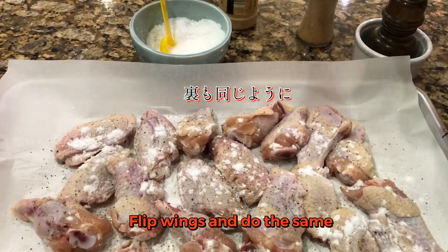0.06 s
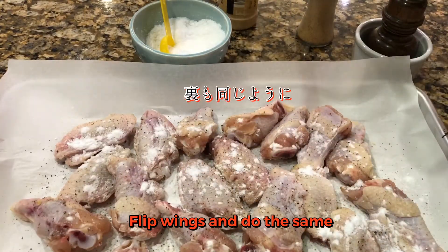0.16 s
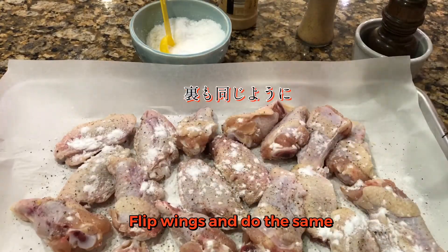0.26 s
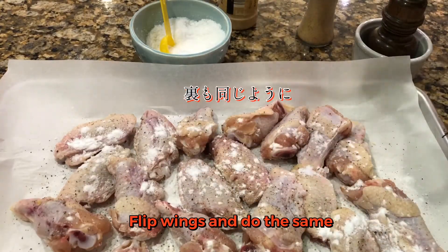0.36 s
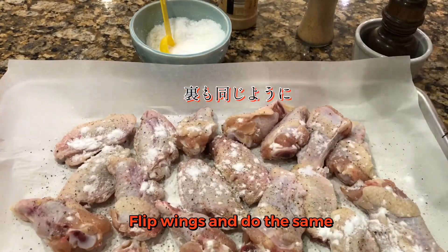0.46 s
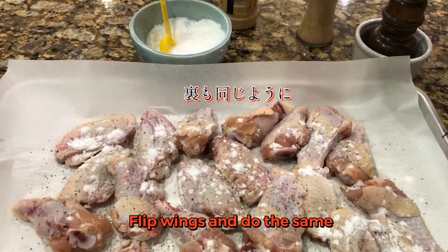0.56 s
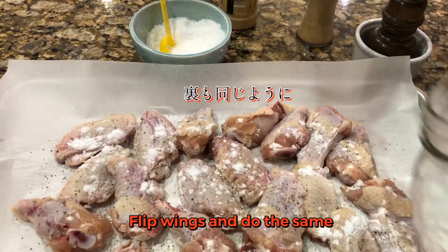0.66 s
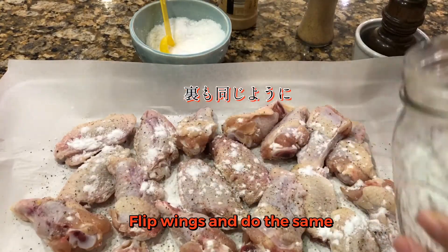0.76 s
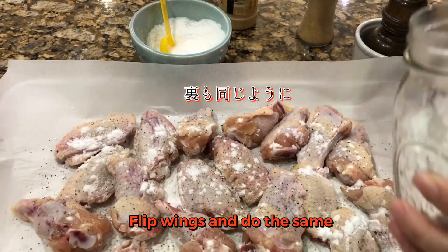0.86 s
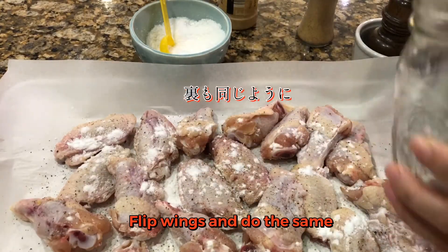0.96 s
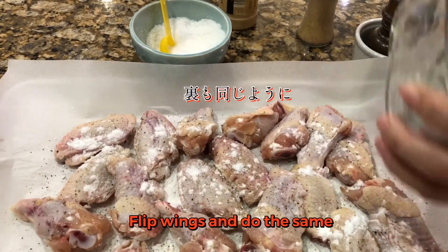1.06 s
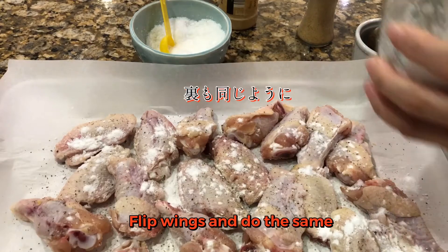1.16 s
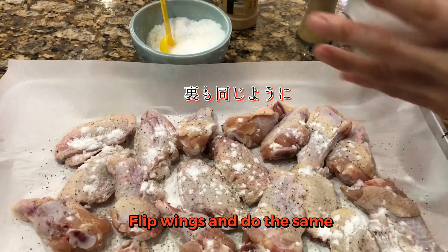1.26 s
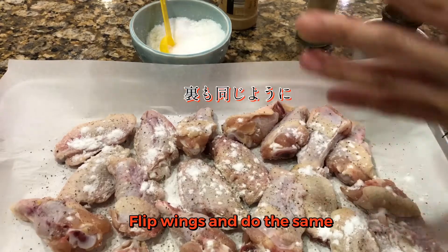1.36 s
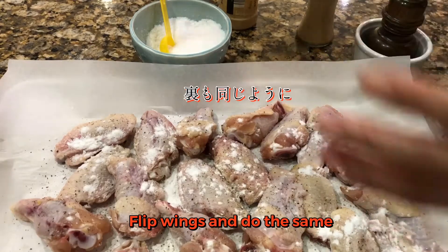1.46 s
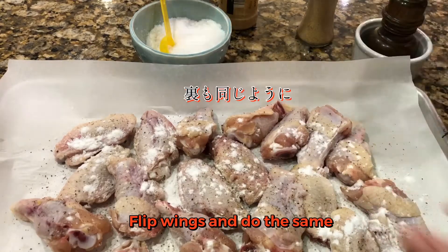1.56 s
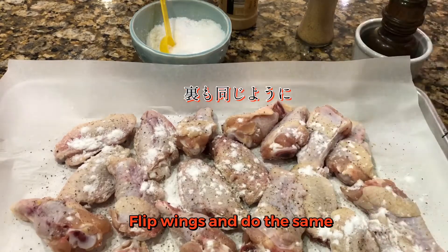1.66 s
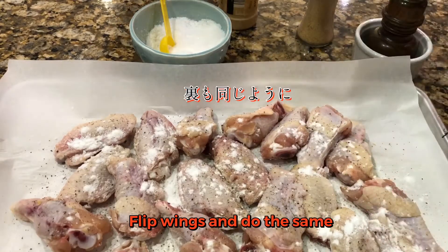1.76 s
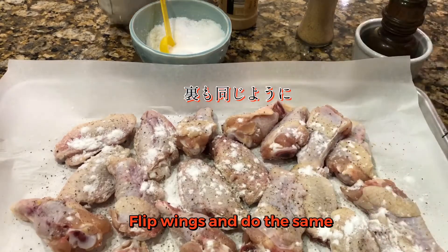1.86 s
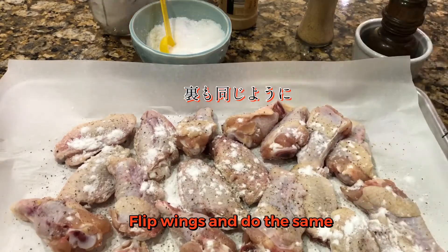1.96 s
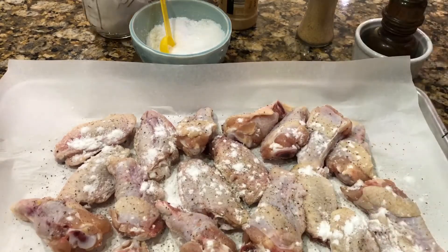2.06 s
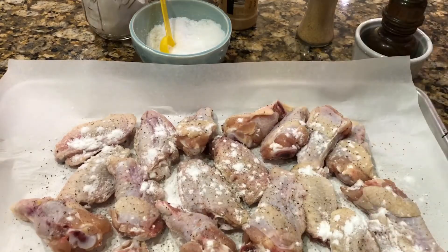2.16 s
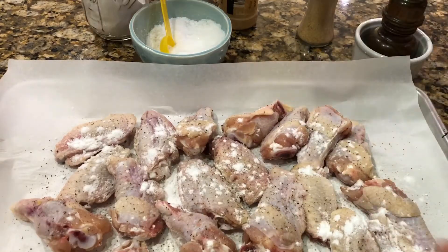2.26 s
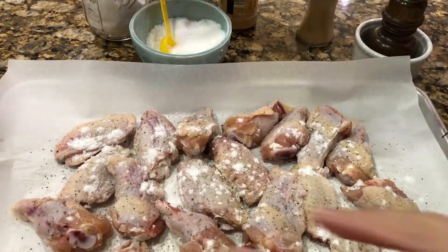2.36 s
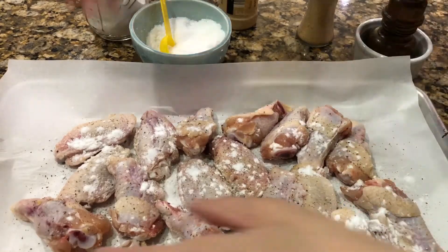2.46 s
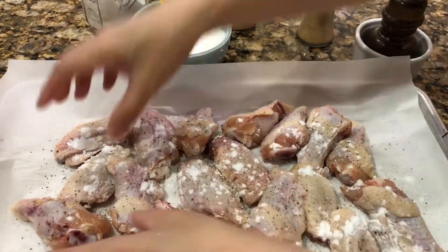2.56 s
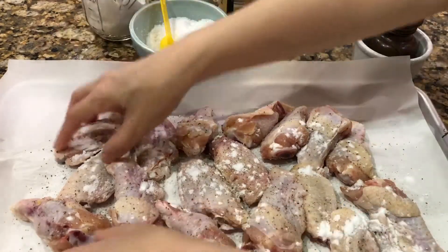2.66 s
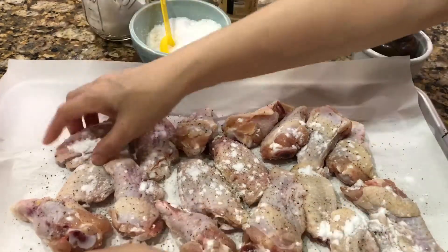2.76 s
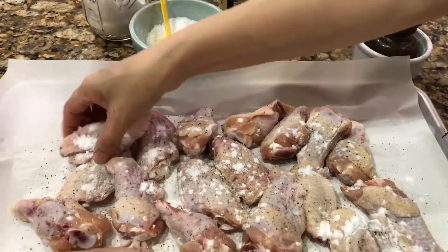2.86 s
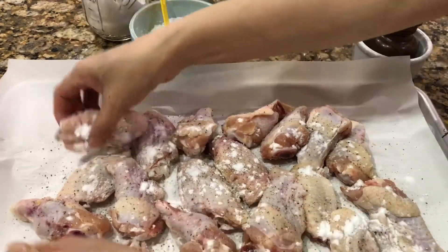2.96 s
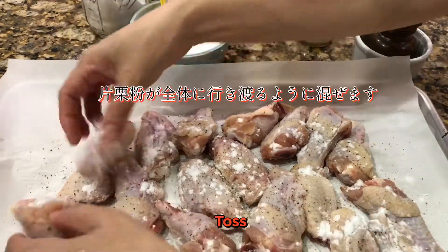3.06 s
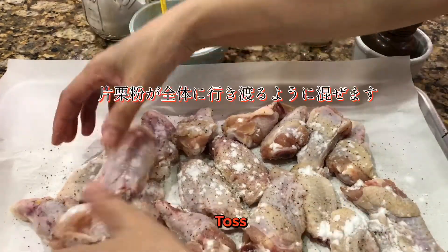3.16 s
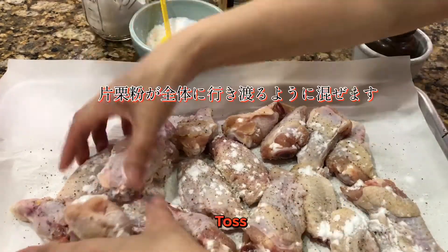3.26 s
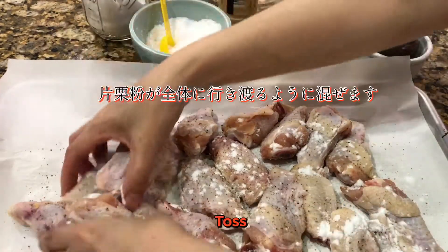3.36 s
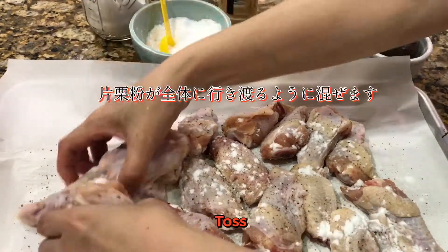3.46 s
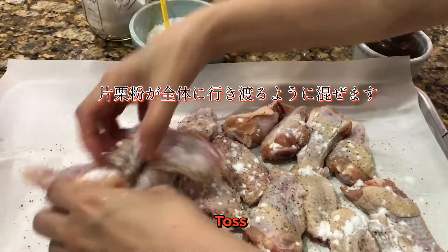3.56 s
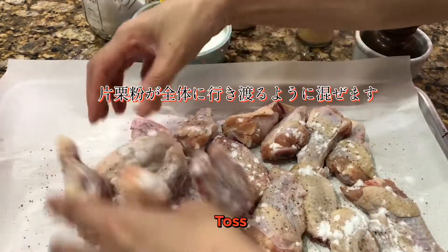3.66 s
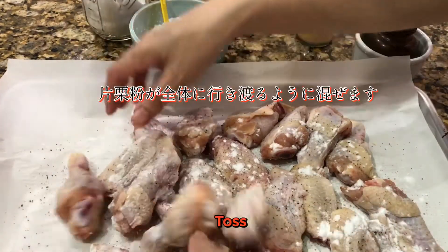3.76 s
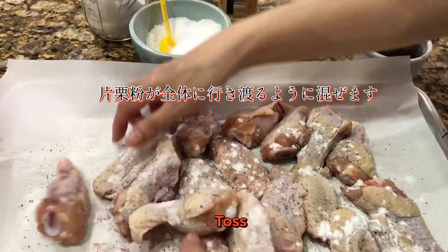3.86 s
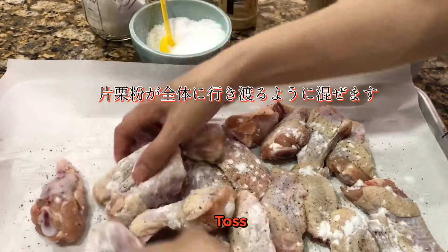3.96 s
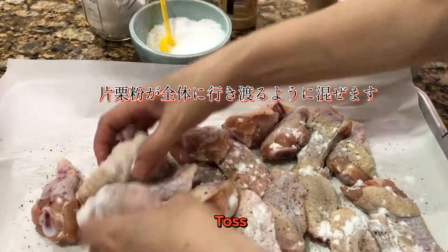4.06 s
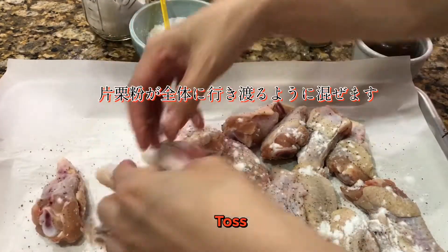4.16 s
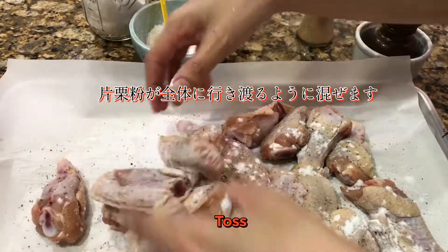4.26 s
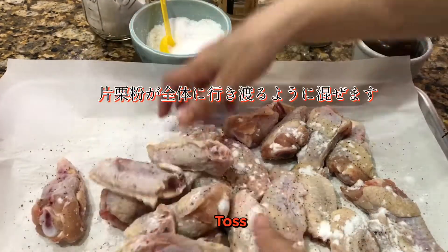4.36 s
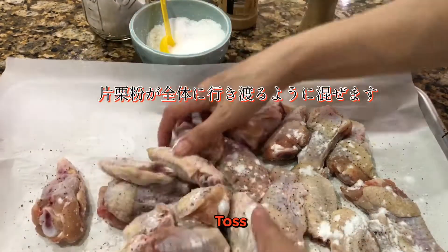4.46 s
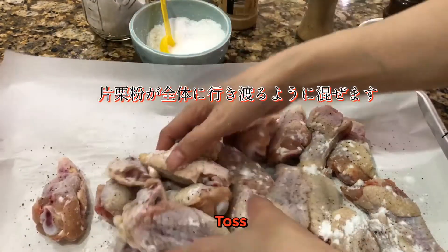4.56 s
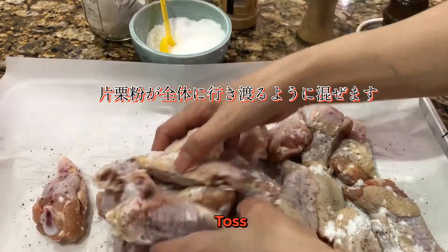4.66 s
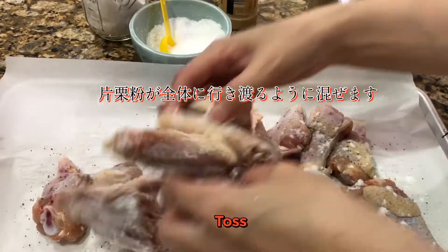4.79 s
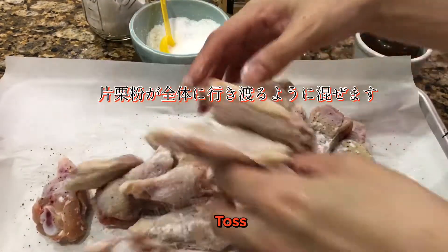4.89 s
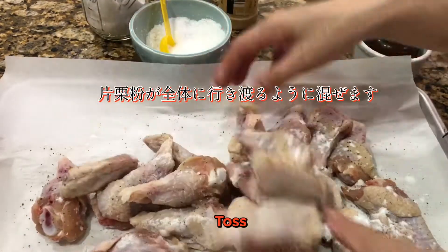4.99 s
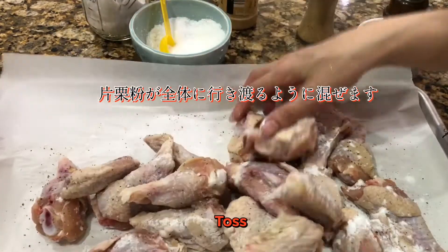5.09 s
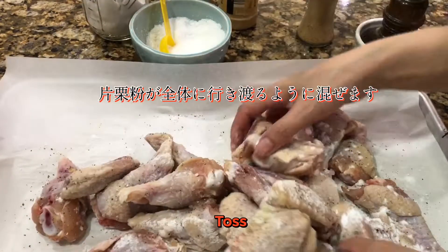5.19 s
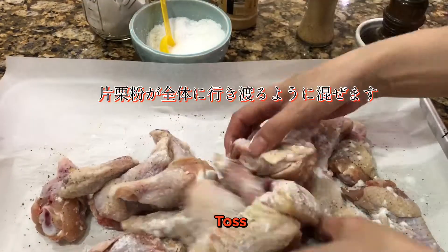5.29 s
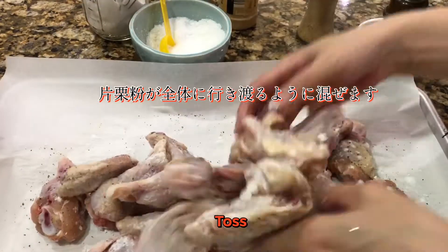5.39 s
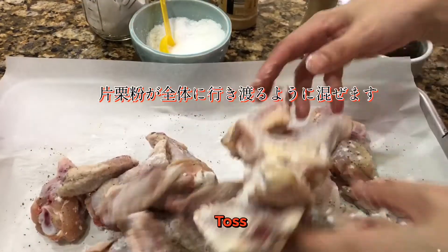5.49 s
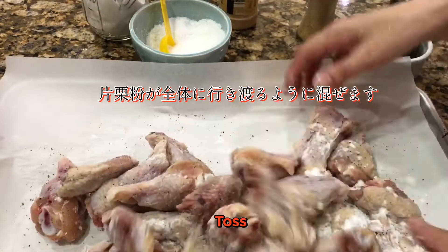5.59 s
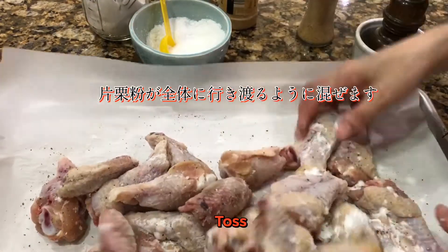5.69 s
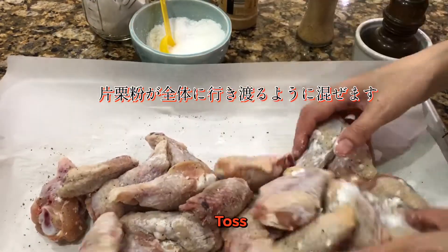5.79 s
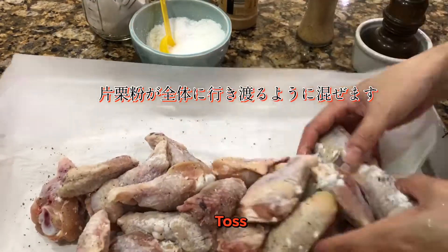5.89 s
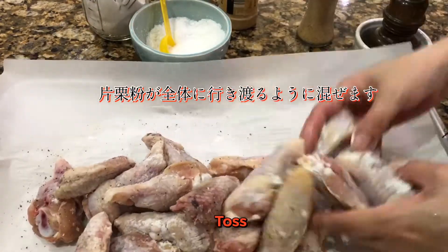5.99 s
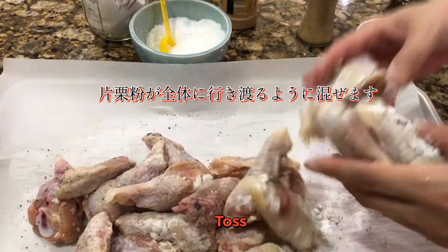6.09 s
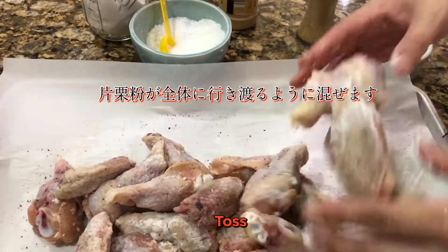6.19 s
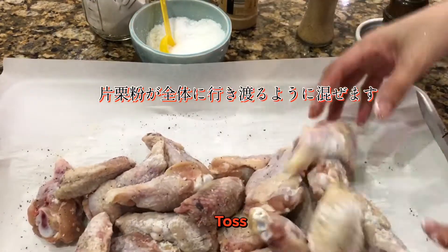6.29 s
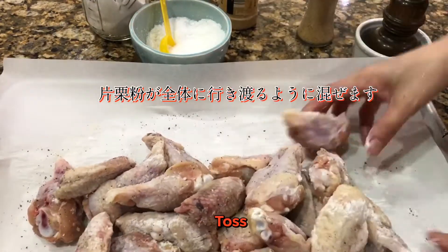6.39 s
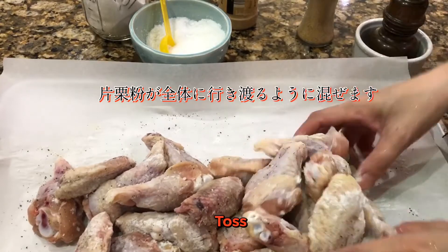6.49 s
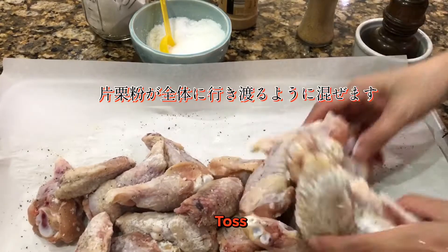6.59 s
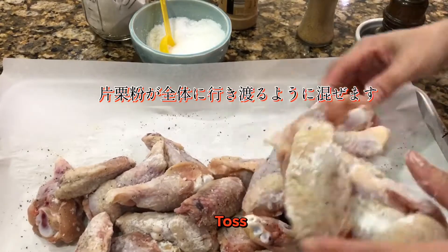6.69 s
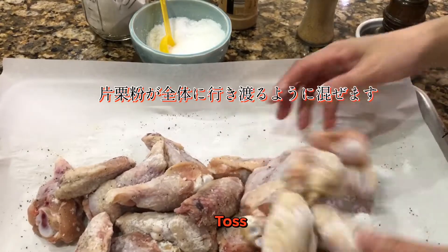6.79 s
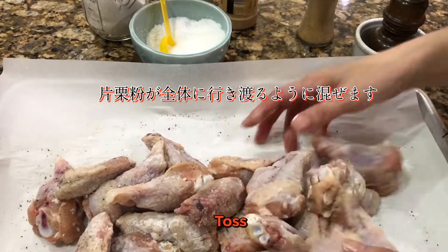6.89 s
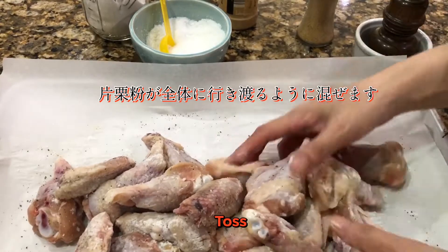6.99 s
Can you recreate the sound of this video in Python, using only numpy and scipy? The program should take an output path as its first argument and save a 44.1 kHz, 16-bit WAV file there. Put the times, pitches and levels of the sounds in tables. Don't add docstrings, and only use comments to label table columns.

```python
import sys
import numpy as np
from scipy import signal
from scipy.fft import rfft, irfft
from scipy.io import wavfile
from scipy.ndimage import uniform_filter1d

SR = 44100
rng = np.random.default_rng(int(sys.argv[2]) if len(sys.argv) > 2 else 0)


def convert_level_to_amplitude(level_db):
    exponent = np.asarray(level_db, float) / 20
    return 10 ** exponent


def output_pcm(signal):
    pcm = np.clip(np.atleast_2d(signal).T, -1, 1) * 32767
    wavfile.write(sys.argv[1], SR, np.round(pcm).astype(np.int16))


N = 310464


def evened(x):
    return x / np.sqrt(np.mean(x ** 2) + 1e-20)


def decay(t, t60):
    return convert_level_to_amplitude(-60 * t / t60)


def onset(t, rise_s):
    return np.minimum(t / rise_s, 1)


def read(points, hz):
    f, value = np.transpose(points)
    return np.interp(np.log(hz + 1), np.log(f + 1), value)


def colour(x, points):
    return irfft(rfft(x) * convert_level_to_amplitude(read(points, np.fft.rfftfreq(len(x), 1 / SR))), len(x))


def resonate(x, hz, width):
    return signal.lfilter(*signal.iirpeak(min(hz, SR / 2.2), max(hz / width, .2), SR), x)


def add(mix, s, sound):
    part = mix[round(s * SR):][:len(sound)]
    part += sound[:len(part)]


def ring(modes, t, spread_db):
    hz, db, t60 = np.transpose(modes)[:, :, None]
    luck, shift = rng.standard_normal((2, *hz.shape))
    detuned = hz * (1 + .002 * shift)
    return (convert_level_to_amplitude(db + spread_db * luck - 60 * t / t60) * np.sin(2 * np.pi * detuned * t)).sum(0)


# [f/Hz, level/dB per Hz]
AIR_SPECTRUM = [(15, -65.5), (49, -11), (90, -17), (159, -7), (300, -13.5), (700, -19.5), (1900, -28),
                (16500, -54.5)]
# [f/Hz, bandwidth/Hz, level/dB]
HUM_LINES = [(120, 9.5, -62), (239.2, 13, -62), (286.6, 4, -59.5)]


def air():
    frames, hz = N // 256 + 5, np.fft.rfftfreq(1024, 1 / SR)
    a, b, patches = rng.standard_normal((frames, 513, 3)).T
    patches = evened(uniform_filter1d(uniform_filter1d(patches, size=8, axis=0), size=16, axis=1))
    spectrum = (a + 1j * b) * convert_level_to_amplitude(0.31 * patches)
    hiss = evened(signal.istft(spectrum, nperseg=1024, noverlap=768)[1][:N])
    hum = sum(convert_level_to_amplitude(db) * evened(resonate(rng.standard_normal(N), hz, width)) for hz, width, db in HUM_LINES)
    return convert_level_to_amplitude(-54) * evened(colour(hiss, AIR_SPECTRUM)) + hum


# [f/Hz, t60/s]
ROOM_DECAY = [(200, 0.64), (600, 0.58), (1500, 0.58), (4000, 0.16), (10000, 0.53)]


def kitchen(x):
    taps = np.zeros(SR)
    at = np.arange(120, SR - 20, 20)
    taps[at + rng.integers(0, 20, len(at))] = rng.choice([-1., 1.], len(at))
    hz, t, z = signal.stft(taps, SR, nperseg=256)
    tail = signal.istft(z * decay(t, read(ROOM_DECAY, hz)[:, None]), SR, nperseg=256)[1]
    return signal.fftconvolve(x, tail / np.linalg.norm(tail))[:N]


# [t/s, peak level/dB]
BASE_KNOCKS = [
    (1.94, -7.5),
    (2.076, -16),
]
# [f/Hz, level/dB per Hz]
THUD_SPECTRA = [
    [(200, -13), (600, -1), (1400, -8), (2200, -9.5), (4300, -18), (5600, -44), (7500, -32.5), (14000, -72)],
    [(180, -50.5), (300, -29), (613, 1), (1060, -10), (1570, -13), (2230, -14.5), (4910, -38),
     (13200, -110)],
]
# [f/Hz, level/dB, t60/s]
COUNTER_MODES = [(206, -15, 0.0374), (336, -16.5, 0.038), (555, -14.5, 0.093)]


def counter():
    out, t = np.zeros(N), np.arange(8000) / SR
    stone = signal.butter(2, 400., "highpass", fs=SR, output="sos")
    for (s, peak_db), thud in zip(BASE_KNOCKS, THUD_SPECTRA):
        grit = colour(rng.standard_normal(len(t)), thud)
        dull = signal.lfilter(*signal.butter(1, 2610, fs=SR), grit)
        bright_part = grit * (decay(t, 0.033) + convert_level_to_amplitude(-29.0) * decay(t, 0.22))
        dying = bright_part + dull * convert_level_to_amplitude(-27.0) * decay(t, 1.43)
        clatter = signal.sosfilt(stone, dying * onset(t, 0.0004))
        crack = convert_level_to_amplitude(-30.0) * decay(t, 0.023) * np.diff(rng.standard_normal(len(t) + 1))
        modes = ring(COUNTER_MODES, t, spread_db=-1.5) * onset(t, 0.0057)
        add(out, s + 0.0023, convert_level_to_amplitude(peak_db) * (clatter / abs(clatter).max() + crack + modes))
    return out


# [f/Hz, level/dB, t60/s]
GLASS_MODES = [(2866, -4, 0.15), (2964, -5, 0.18)]
SHOULDER_MODES = [(5670, -15, .04), (6335, -2, .04), (7085, -7, .05), (7400, -3, .04), (7530, 6, .022),
                  (7660, -1, .03), (8690, 1, .045), (8870, -4, .035)]
LID_MODES = [(10055, -10, .08), (10970, -14, .05), (11790, -10, .045), (12135, -3, .03), (12840, -6, .03),
             (13300, 4, .012), (13840, -1, .025), (14750, -2, .03), (15270, -2, .045)]
# [t/s, glass level/dB, shoulder level/dB, lid level/dB]
JAR_TAPS = [(0.799, -50.5, -53, -55), (0.8495, -77, -69, -50), (0.877, -82, -68, -47),
            (0.8916, -66, -69, -48), (0.9073, -30.5, -22.5, -30), (0.9311, -12.5, -20, -19),
            (0.936, -48, -13.5, -17), (0.989, -56, -36, -50), (1.0562, -39, -41, -31),
            (1.0764, -57, -57, -46), (1.088, -38, -27, -34), (1.1488, -40.5, -30, -42),
            (1.1644, -59, -49, -49.5), (1.449, -47.5, -67.5, -48), (1.499, -53, -45, -61),
            (1.528, -55, -51.5, -43), (1.5614, -62, -63.5, -48.5), (1.7105, -57.5, -54.5, -58),
            (1.8208, -54, -72, -69.5), (1.9994, -45, -67, -60), (2.0736, -43, -65, -54),
            (2.089, -47, -69, -47), (2.113, -52, -56, -38), (2.15, -52, -59, -46), (2.197, -62.5, -73, -44),
            (2.2794, -65, -73, -58)]
# [t/s, level/dB]
BELLY_BUMPS = [
    (0.9089, -31.5),
    (0.919, -31.5),
    (0.9358, -15),
    (0.965, -29.5),
    (1.151, -58),
]
# [f/Hz, level/dB, t60/s]
BELLY_MODES = [(247, -10.5, 0.08), (583, -2, 0.042), (800, -7, 0.05), (1000, -1.5, 0.038),
               (1697, -1.5, 0.08), (2030, -8, .04), (4228, -30, .1), (7530, -5.5, 0.027)]


def jar():
    out, t = np.zeros(N), np.arange(8000) / SR
    peak_over_part_db = 10.5
    beat_lead_turns = .12
    grip = 1 - 0.4 / (1 + np.exp((.02 - t) / 0.002))
    for s, glass_db, shoulder_db, lid_db in JAR_TAPS:
        peak_db = max(glass_db, shoulder_db, lid_db) + peak_over_part_db
        contact = rng.standard_normal(400) * decay(t[:400], 0.022)
        tick = convert_level_to_amplitude(lid_db - 7.5) * np.diff(contact)
        lower = ring(GLASS_MODES[:1], t, spread_db=0)
        leading = ring(GLASS_MODES[1:], t + beat_lead_turns / GLASS_MODES[1][0], spread_db=0)
        body = convert_level_to_amplitude(glass_db + 2.5) * (lower - leading) * grip
        upper = convert_level_to_amplitude(shoulder_db - 14) * ring(SHOULDER_MODES, t, spread_db=3)
        upper = upper + convert_level_to_amplitude(lid_db - 13) * ring(LID_MODES, t, spread_db=3)
        wash_decay = decay(t, 0.046) + convert_level_to_amplitude(-13.0) * decay(t, 0.36)
        crowded_modes = resonate(rng.standard_normal(len(t)), 3600, 3600)
        scraped = signal.oaconvolve(upper, contact / np.linalg.norm(contact))[:len(t)]
        add(out, s + 0.0015, tick)
        add(out, s + 0.00062, convert_level_to_amplitude(peak_db - 21.0) * wash_decay * crowded_modes)
        add(out, s + 0.001, body * onset(t, 0.00064) + scraped)
    for s, db in BELLY_BUMPS:
        add(out, s, convert_level_to_amplitude(db) * ring(BELLY_MODES, t, spread_db=-3.0) * onset(t, 0.0016))
    return out


def along(rows):
    s, *columns = np.transpose(rows)
    i = np.arange(round(s[0] * SR), min(round(s[-1] * SR), N))
    return i, [np.interp(i / SR, s, c) for c in columns]


# [t/s, glass level/dB, shoulder and lid level/dB]
CHATTER_MOVES = [
    [(0.96, -39, -67), (1.15, -48.5, -57), (1.234, -49, -49.5), (1.36, -74.5, -94)],
    [(1.41, -56.5, -98), (1.46, -52, -55.5), (1.6, -63, -58)],
    [(1.7, -65, -68), (1.894, -54, -67.5), (1.93, -66, -84)],
]


def chatter():
    t, glass, upper = np.arange(8000) / SR, np.zeros(N), np.zeros(N)
    sizes = convert_level_to_amplitude(4 * np.minimum(rng.exponential(1, N), 3))
    happens = rng.random(N) < 500. / SR
    contacts = evened(sizes * happens * rng.choice([-1, 1], N))
    grip_s = 0.075
    spot = rng.integers(0, 6, 400)[np.minimum(np.arange(N) / (grip_s * SR), 399).astype(int)]
    for rows in CHATTER_MOVES:
        i, (glass_db, upper_db) = along(rows)
        glass[i] = convert_level_to_amplitude(glass_db - 4.0) * contacts[i]
        upper[i] = convert_level_to_amplitude(upper_db - 6.0) * contacts[i]
    loose = [(hz, min(db, -4), max(t60, .07)) for hz, db, t60 in [*SHOULDER_MODES, *LID_MODES]]
    held_pitch = .989
    out = np.zeros(N)
    for k in range(6):
        glass_ring = ring(GLASS_MODES, held_pitch * t, spread_db=2.5) * decay(t, 0.1)
        upper_ring = ring(loose, t, spread_db=4)
        for x, r in (glass, glass_ring), (upper, upper_ring):
            out += signal.oaconvolve(x * (spot == k), r / np.linalg.norm(r))[:N]
    grazing = resonate(resonate(upper, 5500, 4000), 5500, 4000)
    return out + convert_level_to_amplitude(-5) * grazing


# [t/s, f/Hz, level/dB, t60/s]
STRUCK_PINGS = [(.8505, 11700, -51, 0.054), (.8505, 13890, -58, .06), (.8926, 13690, -51, .08),
                (.8926, 11875, -48, .08), (.909, 7075, -44, .06), (.923, 12190, -31, .06),
                (0.9307, 8680, -18, .03), (.9312, 15270, -17, .035), (.9335, 13800, -17, .03),
                (.9365, 7540, -10.5, 0.02), (.937, 12100, -16.5, 0.028), (.939, 10100, -25, 0.082),
                (0.937, 4250, -26.5, 0.1), (0.92, 975, -31, 0.052), (1.089, 7800, -28, .03),
                (1.089, 3900, -36.5, 0.039), (.938, 7100, -32, 0.14), (.990, 7430, -42, .1),
                (1.0565, 14750, -36, .035), (1.0565, 13470, -40, .03), (1.0565, 7260, -42, .05),
                (1.0565, 6340, -45, 0.041), (1.077, 11865, -48, .04), (1.077, 14750, -50, .05),
                (1.0896, 2875, -18.5, 0.06), (1.089, 6310, -27.5, .046), (1.089, 7450, -32.5, 0.076),
                (1.089, 13480, -34, .04), (1.152, 8500, -35, 0.044), (1.150, 6040, -37, .035),
                (1.150, 7700, -44, .06), (1.150, 3180, -32, .018), (1.1654, 6135, -51, 0.05),
                (1.1654, 10980, -58, 0.14), (1.450, 14750, -49, 0.06), (1.450, 13900, -45, .04),
                (1.500, 8600, -54, .05), (1.5293, 8700, -53, 0.13), (1.5303, 6105, -58, .08),
                (1.5624, 14750, -57, .14), (1.5624, 10130, -59, .06), (1.5624, 11885, -58, .1),
                (1.725, 12300, -58, .035), (1.83, 8700, -63, .1), (1.9415, 13300, -34, .03),
                (1.9414, 7680, -40, 0.032), (2.114, 8800, -48, 0.051), (2.114, 4230, -60, 0.097),
                (2.2804, 11950, -63, 0.05)]
# [t/s, f/Hz, level/dB, t60/s]
LINGERING_RINGS = [(.937, 4245, -47, .7), (.937, 1697, -43, .6), (.966, 575, -34, .05),
                   (1.152, 590, -38, .06), (1.943, 2900, -47, .25), (2.078, 565, -37, .2),
                   (.937, 8680, -47, .25), (.937, 8872, -50, .3), (.937, 13730, -50, .24),
                   (.937, 11790, -48, .2), (.937, 6315, -50, .3), (1.089, 10970, -50, .12),
                   (1.089, 12840, -44, .05), (1.152, 8740, -46, .2), (2.15, 4290, -60, .2)]
# [t/s, level/dB]
LID_SETTLES = [
    (2.0004, -59),
    (2.091, -46),
    (2.151, -49),
    (2.198, -49),
]
# [f/Hz, level/dB, t60/s]
RIM_MODES = [(11950, -1, 0.053), (13910, -3, .045)]


def pings():
    out, t = np.zeros(N), np.arange(16000) / SR
    settling = [(s, hz, db + rim_db, t60) for s, db in LID_SETTLES for hz, rim_db, t60 in RIM_MODES]
    for s, hz, db, t60 in [*STRUCK_PINGS, *LINGERING_RINGS, *settling]:
        add(out, s, convert_level_to_amplitude(db) * decay(t, t60) * np.sin(2 * np.pi * hz * t) * onset(t, 0.00051))
    return out


# [t/s, peak level/dB, f/Hz, t60/s]
TRAY_BUMPS = [(3.291, -43, 120, 0.37), (3.819, -37, 122, 0.26), (4.34, -34, 229, 0.092),
              (5.388, -25.5, 171, .07), (5.39, -25, 64, 0.18), (5.431, -26, 145, 0.2),
              (5.44, -29.5, 51.3, 0.44), (5.555, -25, 368, 0.064), (5.619, -33, 257, 0.13),
              (5.677, -33, 126, 0.1), (6.248, -24, 115, 0.061), (6.779, -26, 234, 0.14),
              (6.783, -35, 120, 0.32)]


def tray():
    out, t = np.zeros(N), np.arange(15000) / SR
    for s, peak_db, hz, t60 in TRAY_BUMPS:
        loose = resonate(resonate(rng.standard_normal(len(t)), 1.26 * hz, 2.0 * hz), 1.26 * hz, 2.0 * hz)
        flex = np.sin(2 * np.pi * hz * t) + .5 * evened(loose)
        add(out, s, convert_level_to_amplitude(peak_db - 7.0) * decay(t, t60) * flex * onset(t, 0.0019))
    return out


# [t/s, peak level/dB]
FLOUR_TICKS = [(.584, -60), (3.067, -47), (3.509, -41), (4.0971, -52), (4.113, -52), (4.1275, -53),
               (4.1609, -44), (4.2003, -35), (4.2762, -43.5), (4.2911, -41), (4.314, -42), (4.976, -33),
               (5.2614, -39), (5.3294, -41.5), (6.6544, -55)]


def ticks():
    out, t = np.zeros(N), np.arange(200) / SR
    for s, peak_db in FLOUR_TICKS:
        click = resonate(rng.standard_normal(len(t)) * decay(t, 0.0088), 10700.0, 7000.)
        add(out, s + 0.0014, convert_level_to_amplitude(peak_db) * click / abs(click).max())
    return out


# [centre t/s, level/dB, f/Hz, half length/s]
PAPER_HOLLOWS = [(2.693, -57, 3450, 0.056), (2.824, -42.5, 2970, 0.013), (3.227, -42, 3820, 0.0089),
                 (3.292, -43, 1880, 0.024), (3.316, -43, 4340, 0.025), (3.846, -42, 2950, 0.04),
                 (3.907, -40, 2720, 0.037), (4.229, -46.5, 1600, 0.021), (4.387, -36.5, 4600, 0.031),
                 (4.449, -39, 1850, 0.046), (4.6, -38, 2590, 0.014), (5.081, -38, 4970, 0.018),
                 (5.145, -45, 1500, 0.036), (5.786, -42, 1390, 0.052), (6.256, -48, 1250, 0.033),
                 (6.388, -41, 1700, 0.044), (6.878, -38, 1610, .02), (6.918, -36.5, 1650, 0.026),
                 (6.967, -44.5, 1540, 0.047), (6.352, -42.5, 4200, 0.045), (2.818, -43.5, 8600, 0.013),
                 (4.029, -45.5, 8300, .006), (3.325, -45, 8040, 0.011), (3.397, -56, 3900, .02),
                 (5.683, -31, 5060, 0.0092)]


def hollows():
    out = np.zeros(N)
    for s, db, hz, half in PAPER_HOLLOWS:
        u = np.arange(-2.5, 2.5, 1 / (half * SR))
        pocket = resonate(resonate(rng.standard_normal(len(u)), hz, 0.5 * hz), hz, 0.5 * hz)
        add(out, s + u[0] * half, convert_level_to_amplitude(db) * evened(pocket) * np.exp(-u ** 2))
    return out


# [centre t/s, peak level/dB, f/Hz]
SKIN_POPS = [(3.266, -38, 1830), (4.056, -21, 1235), (4.216, -40, 1600), (4.334, -29, 1223),
             (4.362, -32.5, 830), (4.872, -34.5, 1770), (5.0398, -25.5, 960), (5.43, -27, 1060),
             (5.516, -29.5, 1260), (5.56, -28, 700), (6.044, -20, 1140), (6.2392, -1.8, 1420),
             (6.308, -22.5, 1800), (6.777, -13, 1090), (6.79, -15, 1240), (6.8053, -28, 780),
             (6.824, -28, 1290)]


def pops():
    out, t = np.zeros(N), np.arange(-300, 300) / SR
    for s, peak_db, hz in SKIN_POPS:
        u = hz * t
        add(out, s + t[0], convert_level_to_amplitude(peak_db) * np.exp(-u ** 2) * np.cos(2 * np.pi * (u - 0.16 * u ** 2)))
        smack = resonate(rng.standard_normal(300), 2.6 * hz, 2.6 * hz) * decay(t[300:], .007)
        add(out, s - .6 / hz, convert_level_to_amplitude(peak_db - 10.) * smack)
    return out


# [peak t/s, rub level/dB, fall time/s, weight/dB]
WING_GRABS = [(2.645, -53.5, 0.18, 1), (2.816, -47.5, 0.04, -3.5), (2.879, -60, 0.23, -6),
              (3.218, -42.5, 0.035, 0), (3.599, -59, 0.058, -16), (3.657, -48, 0.036, -1),
              (3.785, -40, 0.23, 0), (4.22, -48, 0.055, 6.5), (4.362, -39, 0.073, -0.5),
              (4.403, -44, 0.13, 2), (4.6, -46, 0.035, 6), (4.966, -54.5, 0.021, 12),
              (5.023, -42.5, 0.038, 1.5), (5.045, -43, 0.16, 4.5), (5.52, -48.5, 1, 0.5),
              (5.593, -33.5, 0.2, -1), (5.684, -42, 0.034, -5), (5.828, -39.5, 0.049, 7.5),
              (6.204, -42, 0.03, 2.5), (6.244, -36.5, 0.029, 13), (6.31, -41, 0.12, 4),
              (6.751, -54.5, 0.016, 6), (6.781, -45, 0.037, 7.5)]
# [peak t/s, rub level/dB, fall time/s, weight/dB]
WING_SLAPS = [
    (4.3318, -31.5, 0.023, -4.5),
    (6.7782, -31, 0.018, 10.5),
    (6.7915, -33.5, 0.011, 9.5),
]
# [peak t/s, rub level/dB, rise time/s, fall
# time/s, weight/dB]
SLOW_RUBS = [(.08, -71.5, 0.049, 0.11, -13), (3.295, -43.5, 0.053, 0.12, -3.5),
             (3.4, -67, 0.058, 0.53, -5), (3.765, -50, 0.048, 0.13, -2), (3.911, -49, 0.042, 0.082, 7),
             (4.062, -61.5, 0.006, 0.033, 23.5), (4.52, -44.5, 0.15, 0.2, 0.5),
             (4.78, -60.5, 0.025, 0.1, -23), (4.86, -56.5, 0.036, 0.23, -10),
             (5.132, -38.5, 0.046, 0.02, -1), (5.223, -47.5, 0.096, 0.097, -1),
             (5.43, -61.5, 0.14, 0.87, -6), (5.79, -50, 0.03, 0.15, -5),
             (5.955, -47.5, 0.095, 0.042, 2.5), (6.051, -54.5, 0.037, 0.035, 7),
             (6.131, -86, 0.057, 0.079, 11), (6.454, -47.5, 0.14, 0.05, -1), (6.915, -44, 0.11, 0.19, -5),
             (7.02, -51.5, 0.12, 0.3, 0.5)]


def strokes():
    grabs = [(s, db, 0.016 * convert_level_to_amplitude(-0.22 * (db + 58.0)), fall, weight) for s, db, fall, weight in WING_GRABS]
    slaps = [(s, db, 0.0018, fall, weight) for s, db, fall, weight in WING_SLAPS]
    return [(s, db, -4 + weight, -1.5 - 0.63 * weight, rise, fall)
            for s, db, rise, fall, weight in [*grabs, *slaps, *SLOW_RUBS]]


# [f/Hz, level/dB]
PAPER_SPECTRUM = [(180, -38), (350, -3.5), (600, -11), (1830, -0.5), (3900, 1), (6780, -1.5), (15200, -6.5),
                  (16500, -20)]


def sliding():
    chance = rng.standard_normal(N)
    clumps_db = 1.3 * evened(uniform_filter1d(uniform_filter1d(chance, size=300), size=300))
    crackle = np.zeros(N)
    for hz in np.geomspace(900, 12000, num=9):
        sizes = convert_level_to_amplitude(1.3 * np.minimum(rng.exponential(1, N), 4)) * (rng.random(N) < 150. / SR)
        u = np.arange(0, 6, hz / SR)
        crease = np.sqrt(hz) * np.sin(2 * np.pi * u) * u * np.exp(-u / 0.48)
        crackle += signal.oaconvolve(sizes, crease)[:N] * np.sqrt(hz)
    rub = colour((0.63 * evened(crackle) + rng.standard_normal(N)) * convert_level_to_amplitude(clumps_db), PAPER_SPECTRUM)
    z = signal.stft(rub, nperseg=256)[2]
    patches = np.resize(chance, z.shape)
    patches = evened(uniform_filter1d(uniform_filter1d(patches, size=5, axis=0), size=7, axis=1))
    rub = signal.istft(z * convert_level_to_amplitude(2.2 * patches), nperseg=256)[1][:N]
    low = signal.sosfiltfilt(signal.butter(2, 2000, fs=SR, output="sos"), rub)
    high = signal.sosfiltfilt(signal.butter(2, 6500, "highpass", fs=SR, output="sos"), rub)
    low, mid, high = evened(low), evened(rub - low - high), evened(high)
    out = np.zeros(N)
    for s, rub_db, low_db, high_db, rise, fall in strokes():
        i = np.arange(max(round((s - 2 * rise) * SR), 0), min(round((s + 2 * fall) * SR), N))
        late = i / SR - s
        swell_db = 20 * np.where(late < 0, -(late / rise) ** 2, -late / fall)
        parts = mid[i] + convert_level_to_amplitude(low_db) * low[i] + convert_level_to_amplitude(high_db) * high[i]
        out[i] += convert_level_to_amplitude(rub_db + swell_db) * parts
    return out


# [t/s, peak level/dB, centre f/Hz]
BIG_FOLDS = [(2.812, -33, 3250), (3.21, -33, 4170), (3.768, -22, 4700), (3.781, -7.5, 2950),
             (4.3291, -19, 3300), (4.36, -27, 5160), (4.3903, -19, 4210), (4.4671, -16, 2370),
             (4.5305, -18.5, 3550), (4.594, -22, 2380), (4.8332, -22, 4900), (4.872, -28.5, 2000),
             (4.9556, -23, 4040), (5.0435, -10, 4400), (5.1293, -20.5, 4360), (5.423, -24.5, 8500),
             (5.5162, -20.5, 2020), (5.58, -8, 3630), (5.64, -15, 4300), (5.673, -8.5, 4320),
             (5.8257, -7, 3970), (5.835, -12, 6300), (5.867, -15.5, 5950), (5.919, -16, 3920),
             (6.2102, -25, 2620), (6.2415, -12, 4230), (6.305, -19, 4750), (6.3154, -29, 2280),
             (6.776, -13.5, 3980), (6.7926, -18, 4400)]
# [t/s, peak level/dB, centre f/Hz]
SMALL_CRINKLES = [(2.6314, -36, 1790), (2.869, -25.5, 5120), (2.9168, -33.5, 8360), (2.9696, -43.5, 3150),
                  (3.219, -31, 3910), (3.4064, -39, 3840), (3.478, -39, 3400), (3.567, -28, 4600),
                  (3.5902, -31.5, 2940), (3.6444, -37, 4470), (3.6614, -33, 3420), (3.7112, -27, 4940),
                  (4.4109, -20, 1780), (4.411, -22, 6160), (4.3525, -22, 4000), (4.51, -28, 4500),
                  (4.4242, -18.5, 4400), (4.4484, -26, 1510), (4.457, -22, 2620), (4.524, -26, 3920),
                  (4.7531, -34, 1570), (4.91, -26, 9100), (5.0165, -24.5, 3700), (5.224, -23, 3450),
                  (5.3423, -35.5, 3100), (5.4283, -25.5, 2860), (5.4474, -35, 9190), (5.466, -32.5, 5070),
                  (5.482, -33, 5150), (5.4902, -46, 1940), (5.5573, -17, 1700), (5.5984, -14, 4440),
                  (5.6164, -20, 2630), (5.6867, -18, 4020), (5.749, -20.5, 3250), (5.8146, -15, 4010),
                  (5.852, -20, 5930), (5.881, -27, 2750), (5.944, -25, 9100), (5.9542, -25, 2900),
                  (5.9834, -28, 3800), (6.0614, -30, 3720), (6.4745, -25, 5470), (6.8036, -22, 2710),
                  (2.7424, -40, 7000), (2.981, -45, 8000), (3.4614, -46, 7000), (4.054, -30, 3720),
                 (5.506, -26, 9500), (5.708, -21, 7000), (6.0337, -31, 8000), (6.093, -40, 7500),
                 (6.153, -44, 4500), (6.195, -37, 4000), (6.214, -20, 3480), (6.2213, -36, 4500),
                 (6.2535, -24, 5000), (6.3684, -25, 9500), (6.4, -30, 6000)]


def folds():
    big = [(*row, 0.027) for row in BIG_FOLDS]
    return big + [(*row, 0.017) for row in SMALL_CRINKLES]


def snaps():
    out, t = np.zeros(N), np.arange(4000) / SR
    for s, peak_db, hz, t60 in folds():
        t60 = max(t60, .003)
        burst = rng.standard_normal(len(t)) * decay(t, t60) * onset(t, 0.00073)
        fold = resonate(burst, hz, 0.54 * hz)
        tone = np.sin(2 * np.pi * hz * t) * decay(t, t60 / 2) * onset(t, 0.00087)
        fold = fold / abs(fold).max() + .5 * tone
        edge = np.diff(burst, prepend=0)
        snap = fold / abs(fold).max() + convert_level_to_amplitude(-56.0) * edge / abs(edge).max()
        add(out, s, convert_level_to_amplitude(peak_db - 4.5) * snap)
    return out


def scene():
    jar_sounds = jar() + chatter() + pings()
    knocks = counter()
    near = sliding() + snaps() + pops() + ticks() + hollows()
    wet = kitchen(convert_level_to_amplitude(-15.5) * jar_sounds + convert_level_to_amplitude(-11.5) * knocks + convert_level_to_amplitude(-12.5) * near)
    return (jar_sounds + knocks + near + wet + tray() + air())[None]


def top_cut(x):
    return signal.sosfilt(signal.butter(12, 16960, fs=SR, output="sos"), x)


def record(dry):
    low_cut = signal.sosfilt(signal.butter(2, 44.7, "highpass", fs=SR, output="sos"), dry)
    banded = signal.oaconvolve(low_cut, signal.firwin(301, 15700, fs=SR)[None], "same")
    return top_cut(banded)


dry = scene()
out = record(dry)
output_pcm(out)
```